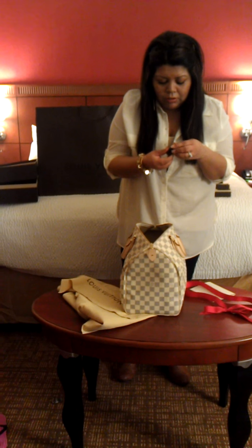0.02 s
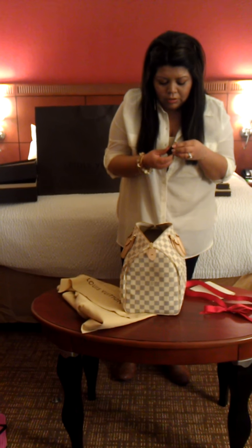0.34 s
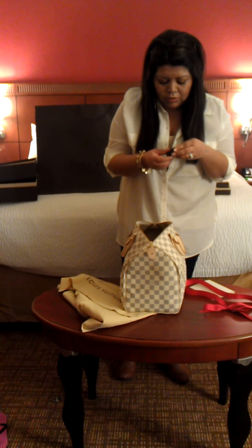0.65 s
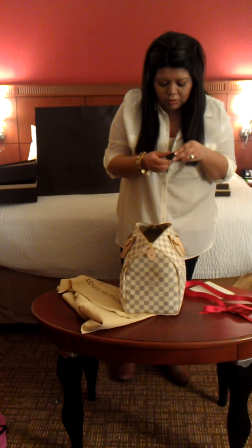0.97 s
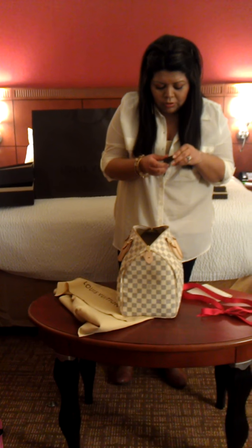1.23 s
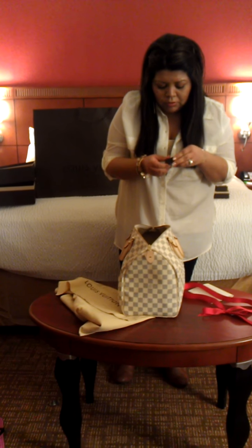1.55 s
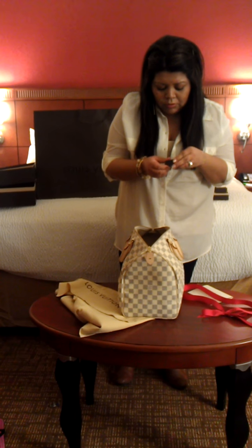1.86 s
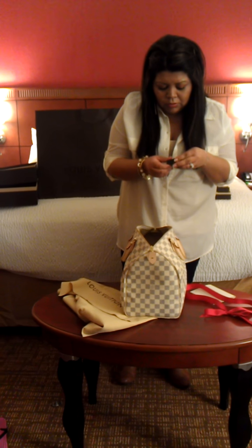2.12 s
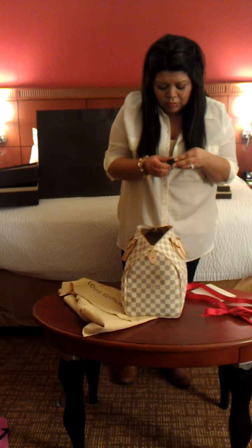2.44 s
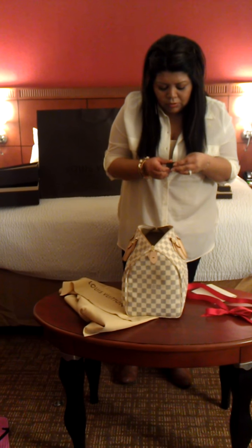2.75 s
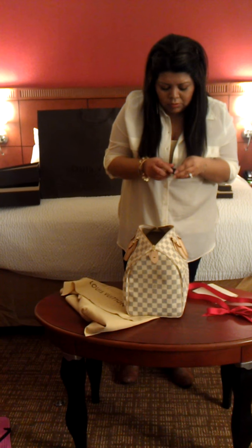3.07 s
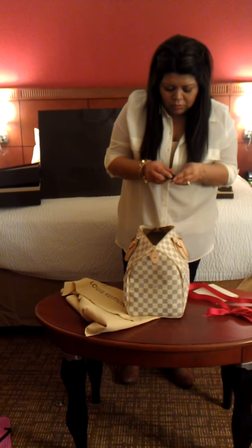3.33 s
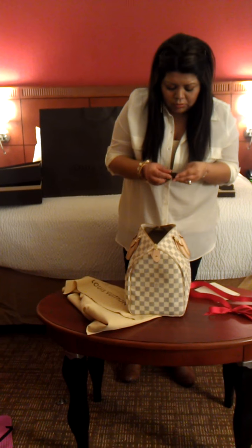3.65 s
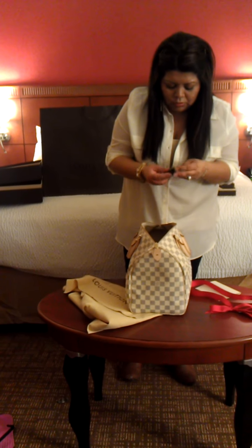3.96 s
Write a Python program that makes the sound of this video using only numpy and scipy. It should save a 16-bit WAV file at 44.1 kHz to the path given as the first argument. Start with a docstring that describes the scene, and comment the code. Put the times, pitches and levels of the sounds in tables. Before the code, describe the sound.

Faint, irregular clicks of a metal clasp in the fingers end in one sharp snap.

```python
"""A small metal clasp is worked between the fingers, a couple of metres away in a quiet bedroom.
Its parts click and tick at uneven moments; metal scrapes on metal, swelling as the spring is pressed,
until the spring shuts with a loud snap, rebounds and seats. The table top, floor and walls answer the
clicks, the scrape and the snap. A low room tone lies underneath."""
import sys
import numpy as np
from scipy import signal
from scipy.fft import rfft, irfft, next_fast_len
from scipy.io import wavfile
from scipy.ndimage import map_coordinates

SR = 44100
rng = np.random.default_rng(int(sys.argv[2]) if len(sys.argv) > 2 else 0)


def generate_wav(sig):
    """Save sig (samples, or channels by samples) to the path in sys.argv[1] as 16-bit PCM at SR."""
    pcm = np.round(np.clip(np.atleast_2d(sig).T, -1, 1) * 32767).astype(np.int16)
    wavfile.write(sys.argv[1], SR, pcm)


N = 176400
HIT_SAMPLES = 32768
HIT_TIME_S = np.arange(HIT_SAMPLES) / SR

# Clicks of the clasp: start_s, knock_db, clack_db, ring_db, clack_pitch_hz, contact_t60_s
CLICK_CUES = [(.094, -75.5, -76, -74.5, 2870, 0.0051), (.351, -72.5, -73.5, -66.5, 2140, 0.024),
              (.394, -70, -77, -72.5, 1800, 0.017), (.526, -67.5, -61, -62, 2840, .03),
              (.533, -63.5, -61, -61, 2400, 0.054), (.744, -73, -71.5, -77, 3360, .025),
              (.946, -86, -71, -72.5, 2370, 0.02), (1.1, -97, -109, -82, 2315, .015),
              (1.2045, -54.5, -55.5, -62, 3135, .012), (1.209, -57.5, -56, -57.5, 1930, 0.021),
              (1.72, -80, -76, -71, 2800, .05), (1.9415, -61, -64, -69, 1630, .03),
              (1.9465, -57, -62, -65, 2600, .04), (1.956, -67, -64, -60.5, 2900, .04),
              (1.972, -69, -61, -60, 2900, .03), (2.802, -70.5, -63, -70, 2225, 0.018),
              (2.806, -69, -67.5, -64, 2190, 0.065), (2.978, -82, -76, -67.5, 2490, 0.018),
              (3.018, -76, -71, -70, 2240, 0.021), (3.04, -68.5, -66.5, -65.5, 2050, 0.022),
              (3.078, -90, -78, -73, 2400, .025), (3.176, -87, -72.5, -73.5, 2210, .03),
              (3.228, -92, -87, -75.5, 2480, 0.015), (3.349, -88, -80, -71, 2500, .03),
              (3.405, -78, -80, -69, 3040, 0.025), (3.481, -90, -74, -69, 2256, 0.028),
              (3.4966, -83, -70, -60, 2800, 0.04)]
# A click's three voices, dull knock, mid clack and bright ring: frequency_hz, level_db
KNOCK_COLOUR = [(120, -33), (250, -4), (400, -0.5), (680, 5.5), (900, 1), (1200, -2), (1600, -1),
                (2500, -43)]
CLACK_COLOUR = [(900, -40), (1500, -9), (2000, 8), (2600, -8), (3100, -7), (4000, -4.5), (5500, -18),
                (7000, -28.5), (10000, -50)]
RING_COLOUR = [(4000, -12.5), (6300, -11.5), (7400, -1.5), (8300, 5), (9200, -4.5), (10500, -5.5),
               (12000, -14.5), (14000, -7.5), (15500, -35)]
# The spring shutting, rebounding and seating: start_s, crack_db, splash_db, pop_db, pop_pitch_hz
SNAP_CUES = [(3.6822, -42, -40, -51.5, 1500), (3.686, -43, -45, -45, 1280), (3.6888, -48.5, -46, -57, 1410),
             (3.711, -62, -64, -49, 1149)]
# Tone of the spring's crack: frequency_hz, level_db
CRACK_COLOUR = [(300, -43), (600, -28), (850, -14), (1020, -9), (1200, -10), (1480, 6), (1850, -18),
                (2170, -5), (2480, -20), (2900, -8), (4200, -21), (5500, -21), (7000, -21), (7700, -21),
                (8700, -0.5), (9600, -9), (12000, -22), (15500, -37)]
# Ringing modes of the sprung clasp: pitch_hz, level_db, t60_s
CLASP_MODES = [(1190, 20, 0.16), (1550, -4, 0.08), (2270, -6, 0.13), (2990, -1, 0.055), (7300, 5, 0.091),
               (7815, 3, 0.084), (7800, 2, 0.08), (7800, 2, 0.14), (8400, -10, 0.14), (9070, 13.5, 0.12)]
# Swells of metal sliding on metal: time_s, level_db
SCRAPE_ENVELOPE = [(0, -88), (.32, -96), (.38, -75.5), (.46, -86.5), (.54, -76.5), (.76, -85), (.86, -139),
                   (1.1, -84.5), (2.7, -85.5), (2.94, -90.5), (3.03, -69.5), (3.12, -72.5), (3.3, -80),
                   (3.39, -72.5), (3.46, -75.5), (3.52, -67.5), (3.57, -77.5), (3.61, -63.5), (3.65, -58),
                   (3.68, -49.5), (3.7, -79), (3.88, -74), (4, -80)]
# Tone of the scrape: frequency_hz, level_db
SCRAPE_COLOUR = [(400, -24.5), (1200, 0), (2200, 7), (3200, 4), (4300, 3.5), (5800, -17.5), (7200, -8),
                 (8500, 2.5), (10000, 3.5), (12000, -7.5), (14000, -20), (15500, -38.5)]
# Fine sizzle that rides on the scrape and lingers after the snap: time_s, level_db
SIZZLE_ENVELOPE = [(0, -93), (3.08, -93), (3.22, -78), (3.6, -80), (3.85, -73.5), (4, -74)]
# Airy top of the sizzle: frequency_hz, level_db
SIZZLE_TONE = [(5000, -24), (9000, -1), (12000, 2), (14500, 6), (16000, -23)]
# Small dry ticks close by: start_s, level_db, pitch_hz
TICK_CUES = [(.518, -57, 744), (.647, -63, 2700), (0.648, -62, 850), (1.2135, -48, 697), (2.838, -62, 600),
             (3.013, -65, 700), (3.504, -61.5, 11700), (3.6895, -50, 11600), (3.904, -60, 660)]
# Early echoes off table, floor and walls: delay_s, gain
EARLY_ECHOES = [(.0016, 0.79), (.0039, 0.99), (.0056, 1), (.0079, 1), (0.01, 0.99), (.0195, 0.34),
                (.033, 0.23)]
# Decay of the bedroom's tail: frequency_hz, t60_s
ROOM_DECAY = [(200, .34), (1200, .39), (2000, .45), (3300, .38), (8000, .3), (15000, .24)]
# Slow drift of the room's rumble: time_s, level_db
RUMBLE_ENVELOPE = [(0, -67.5), (1, -70), (2.3, -71), (3.2, -76), (4, -73)]
# The room tone's two beds, rumble and hiss: frequency_hz, level_db
RUMBLE_COLOUR = [(25, -8), (60, -11.5), (90, -3), (120, -2), (160, -3.5), (220, -0.5), (350, -8.5),
                 (700, -20.5), (2000, -70.5)]
HISS_COLOUR = [(100, -4), (400, 1.5), (800, -.5), (1300, -4), (2200, -9), (4000, -21), (5500, -36),
               (8500, -32), (15500, -36)]


def clasp_clicks():
    """Each click layers a dull knock, a clack whose pitch depends on the grip, and a bright ring."""
    out = np.zeros(N)
    knock, clack, ring = struck(KNOCK_COLOUR), struck(CLACK_COLOUR), struck(RING_COLOUR)
    for start_s, knock_db, clack_db, ring_db, pitch_hz, t60_s in CLICK_CUES:
        pitched_clack = unit_hit(clack) + unit_hit(resonance(pitch_hz, width=0.14))
        voices = [(knock_db, knock), (clack_db, pitched_clack), (ring_db, ring)]
        click = sum(amp(level_db) * contact(voice, t60_s) for level_db, voice in voices)
        add(out, start_s, bedroom(click))
    return out


def spring_snap():
    """The spring lets go, rebounds and seats: each blow a crack, a ring, a bright splash and a pop."""
    out = np.zeros(N)
    crack, bright = struck(CRACK_COLOUR), struck(RING_COLOUR)
    contact_t60_s = 0.0058
    for start_s, crack_db, splash_db, pop_db, pop_hz in SNAP_CUES:
        ring = amp(-11) * metal_ring()
        grit = amp(-5.5) * contact(crack, contact_t60_s)
        body = amp(crack_db) * (unit_hit(crack) / 2 + grit + ring)
        splash = amp(splash_db) * contact(bright, contact_t60_s)
        pop = amp(pop_db) * finger_pop(pop_hz)
        add(out, start_s, bedroom(body + splash + pop))
    return out


def metal_ring():
    """The clasp's modes ring out; the grip detunes each a little from blow to blow."""
    ring = np.zeros(HIT_SAMPLES)
    for pitch_hz, level_db, t60_s in CLASP_MODES:
        decay = amp(level_db + rng.normal(0, 2) - 60 * HIT_TIME_S / t60_s)
        detuned_hz = pitch_hz * rng.normal(1, 0.0121)
        ring += decay * np.sin(2 * np.pi * detuned_hz * HIT_TIME_S)
    return unit_hit(ring)


def finger_pop(pitch_hz):
    """The hollow of the fingers rings briefly at one pitch."""
    return unit_hit(resonance(pitch_hz, width=0.28, order=3))


def metal_scrape():
    """Dense tiny slips of metal on metal stutter and swell as the spring is pressed; sizzle on top."""
    slips_per_s, spread_db, stutter_db, room_send = 3000, 2.5, 3, 0.41
    slips = (rng.random(N) < slips_per_s / SR) * rng.standard_normal(N)
    slips *= amp(spread_db * rng.standard_normal(N))
    slips *= amp(stutter_db * wobble(knots_per_s=70))
    texture = unit_rms(signal.fftconvolve(slips, struck(SCRAPE_COLOUR))[:N])
    scrape = texture * envelope(SCRAPE_ENVELOPE)
    placed = room_send * bedroom(scrape)[:N] + (1 - room_send) * scrape
    sizzle = noise(SIZZLE_TONE) * envelope(SIZZLE_ENVELOPE)
    return placed + sizzle


def dry_ticks():
    """Tiny contacts, each through one broad resonance, with no room on them."""
    out = np.zeros(N)
    for start_s, level_db, pitch_hz in TICK_CUES:
        tick = contact(resonance(pitch_hz, width=1, order=3), t60_s=0.01)
        add(out, start_s, amp(level_db) * tick)
    return out


def bedroom(sound):
    """Direct sound, early echoes and a diffuse tail drawn afresh for each sound."""
    tail_db, tail_rise_s = 3.5, 0.011
    hz, time_s, bands = signal.stft(rng.standard_normal(HIT_SAMPLES), SR, nperseg=256)
    decay = amp(-60 * time_s / along(ROOM_DECAY, hz)[:, None])
    tail = signal.istft(bands * decay, SR, nperseg=256)[1][:HIT_SAMPLES]
    tail *= 1 - np.exp(-HIT_TIME_S / tail_rise_s)
    response = amp(tail_db) * tail / np.linalg.norm(tail)
    response[0] += 1  # direct sound
    for delay_s, gain in EARLY_ECHOES:
        response[round(delay_s * SR)] += gain
    return signal.fftconvolve(sound, response)


def room_tone():
    """A low rumble eases off and lifts a little at the end, under a faint even hiss."""
    rumble = noise(RUMBLE_COLOUR) * envelope(RUMBLE_ENVELOPE)
    hiss = noise(HISS_COLOUR) * amp(-72)
    return rumble + hiss


def contact(body, t60_s):
    """A brief rough contact: a noise burst heard through a body's response."""
    attack_s = 0.024 * t60_s
    burst = rng.standard_normal(HIT_SAMPLES) * amp(-60 * HIT_TIME_S / t60_s)
    attack = 1 - np.exp(-HIT_TIME_S / attack_s)
    return unit_hit(signal.fftconvolve(burst * attack, body)[:HIT_SAMPLES])


def struck(colour):
    """Minimum-phase impulse response of a body with the given colour."""
    hz = np.fft.rfftfreq(HIT_SAMPLES, 1 / SR)
    cepstrum = irfft(np.log(amp(along(colour, hz))))
    cepstrum[1:HIT_SAMPLES // 2] *= 2
    cepstrum[HIT_SAMPLES // 2 + 1:] = 0
    return irfft(np.exp(rfft(cepstrum)))


def resonance(pitch_hz, width, order=1):
    """Impulse response of `order` band-passes in series; width is each one's bandwidth over pitch."""
    hz = np.fft.rfftfreq(HIT_SAMPLES, 1 / SR)
    damping = 1j * hz * pitch_hz * width
    return irfft((damping / (pitch_hz ** 2 - hz ** 2 + damping)) ** order)


def noise(colour):
    """Steady coloured noise at rms 1."""
    white = rng.standard_normal(N + HIT_SAMPLES)
    return unit_rms(signal.fftconvolve(white, struck(colour))[HIT_SAMPLES:HIT_SAMPLES + N])


def wobble(knots_per_s):
    """A smooth random curve."""
    return map_coordinates(rng.standard_normal(N), [np.arange(N) * knots_per_s / SR])


def envelope(points):
    """A fader ride: gain per sample from (time_s, level_db) points."""
    return amp(np.interp(np.arange(N) / SR, *np.transpose(points)))


def along(points, hz):
    """Read (frequency_hz, value) points on a log frequency axis."""
    point_hz, values = np.transpose(points)
    return np.interp(np.log(hz + 1), np.log(point_hz + 1), values)


def amp(db):
    """Decibels to gain."""
    return 10 ** (np.asarray(db) / 20)


def unit_rms(sound):
    """Scale to rms 1."""
    return sound / np.sqrt(np.mean(sound ** 2) + 1e-30)


def unit_hit(hit):
    """Scale a hit to the energy of 4 ms at rms 1."""
    return hit * np.sqrt(0.004 * SR / (np.sum(hit ** 2) + 1e-30))


def add(track, start_s, sound):
    """Lay a sound into the track at its cue."""
    start = max(0, round(start_s * SR))
    track[start:start + len(sound)] += sound[:max(0, N - start)]


def scene():
    """The clasp over the room tone, in mono."""
    return (clasp_clicks() + dry_ticks() + spring_snap() + metal_scrape() + room_tone())[None]


def record(dry):
    """Cut the very top of the treble and add a small constant offset."""
    cutoff_hz, dc_offset = 15800, -0.0213
    size = next_fast_len(N + HIT_SAMPLES)
    passband = np.fft.rfftfreq(size, 1 / SR) < cutoff_hz
    return irfft(rfft(dry, size) * passband, size)[:, :N] + dc_offset


dry = scene()
out = record(dry)
generate_wav(out)
```